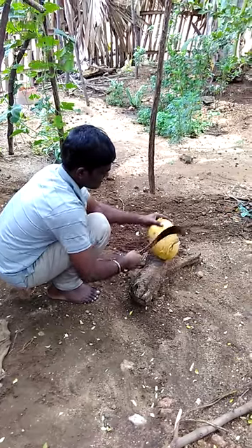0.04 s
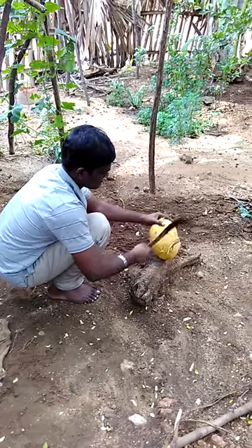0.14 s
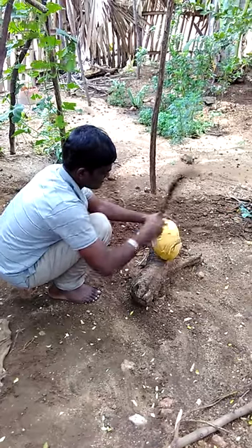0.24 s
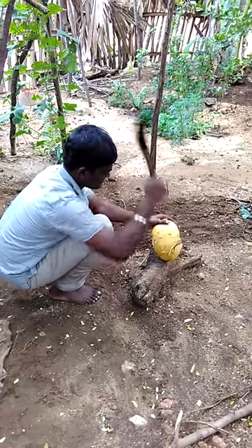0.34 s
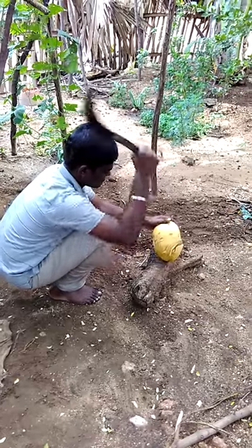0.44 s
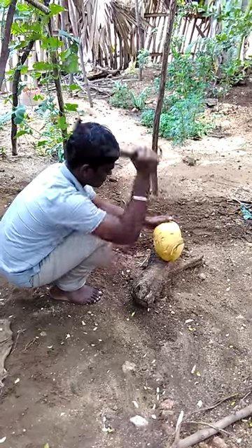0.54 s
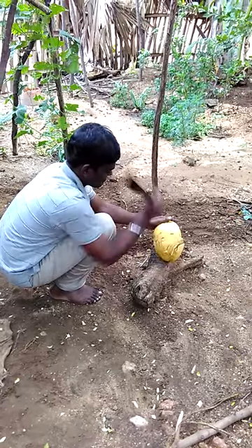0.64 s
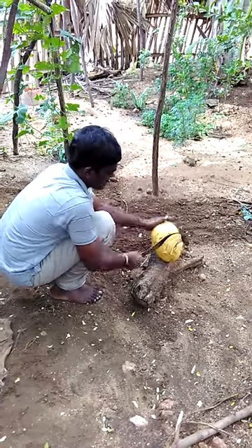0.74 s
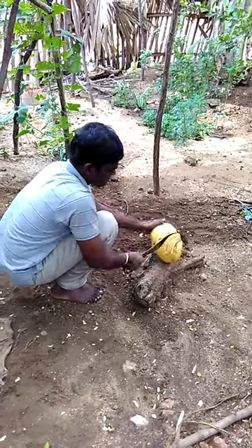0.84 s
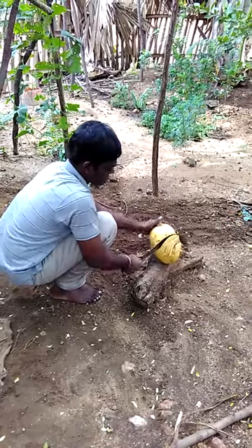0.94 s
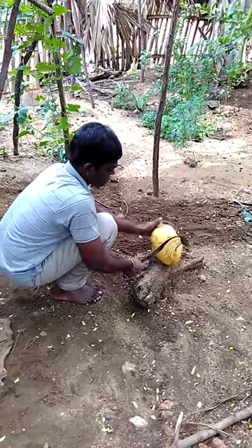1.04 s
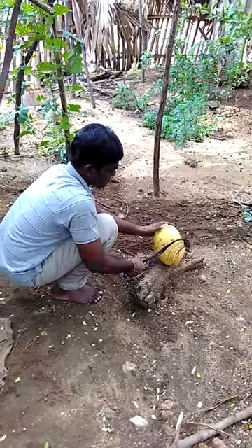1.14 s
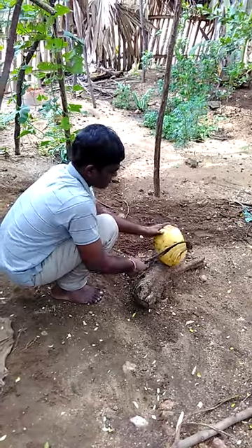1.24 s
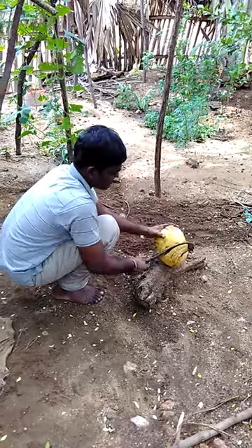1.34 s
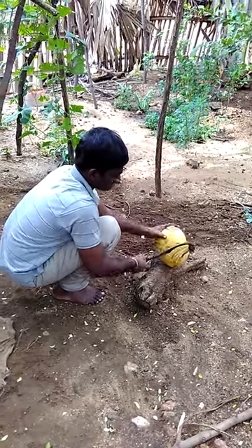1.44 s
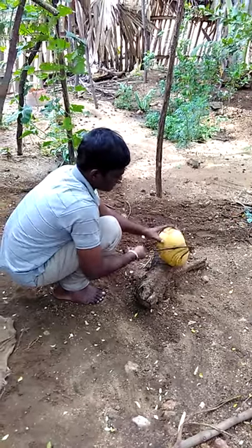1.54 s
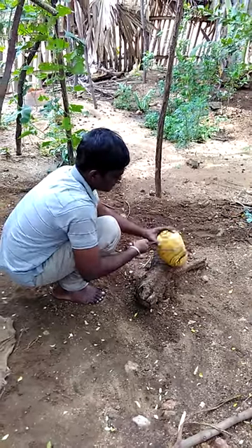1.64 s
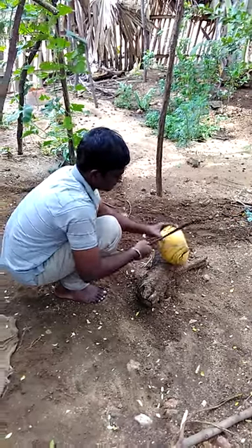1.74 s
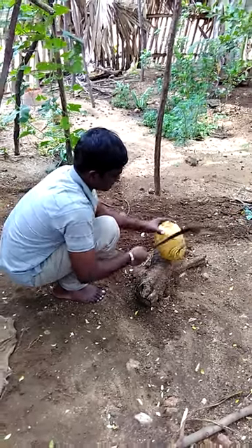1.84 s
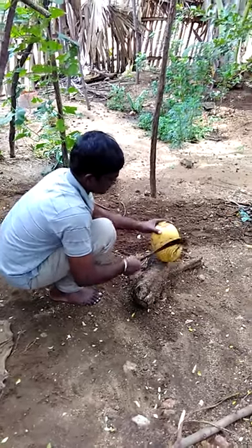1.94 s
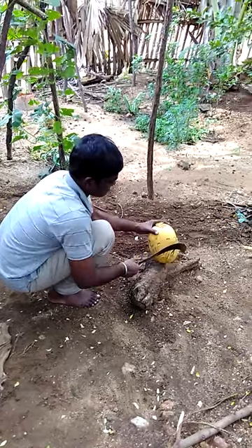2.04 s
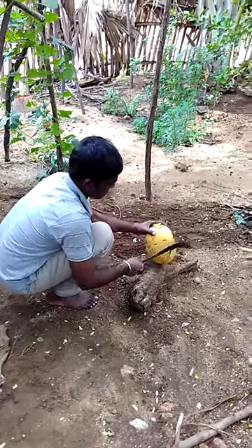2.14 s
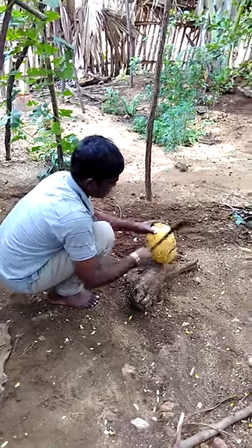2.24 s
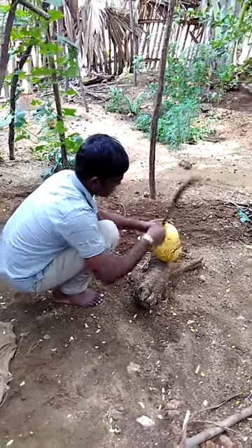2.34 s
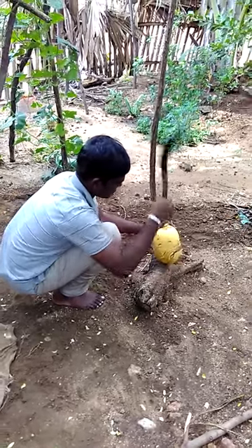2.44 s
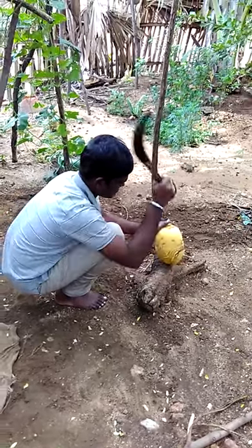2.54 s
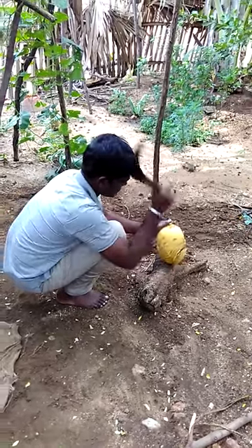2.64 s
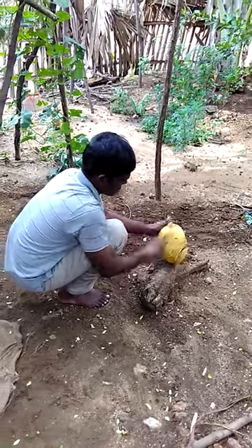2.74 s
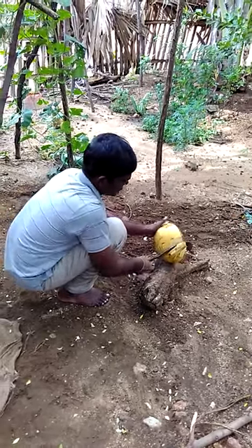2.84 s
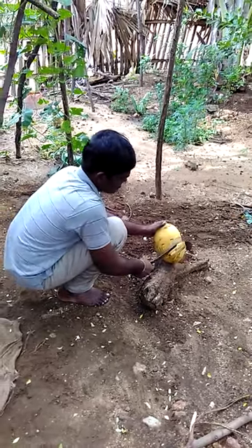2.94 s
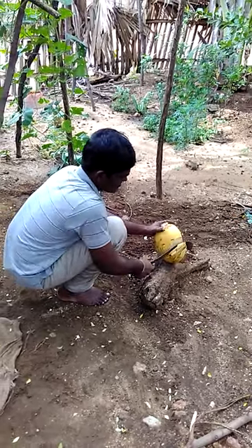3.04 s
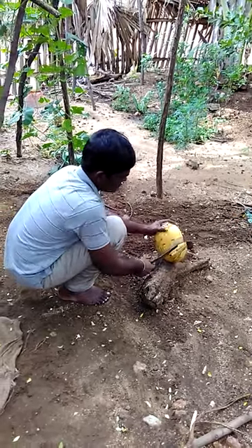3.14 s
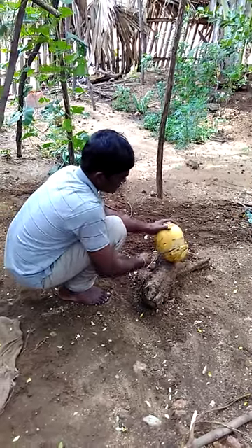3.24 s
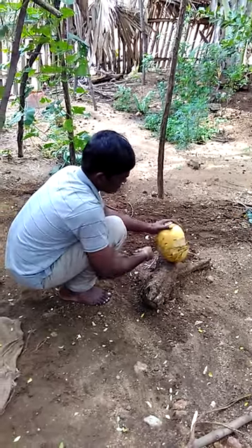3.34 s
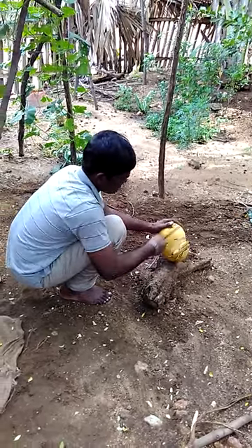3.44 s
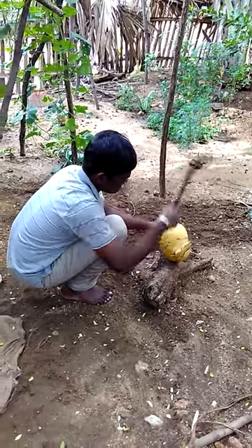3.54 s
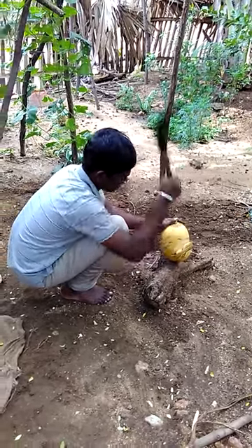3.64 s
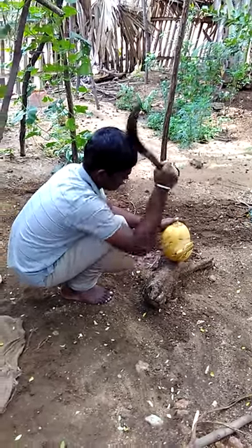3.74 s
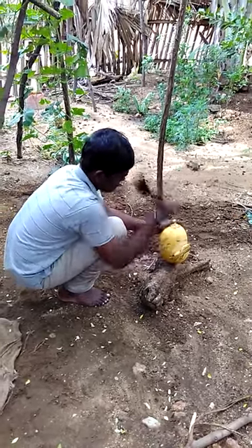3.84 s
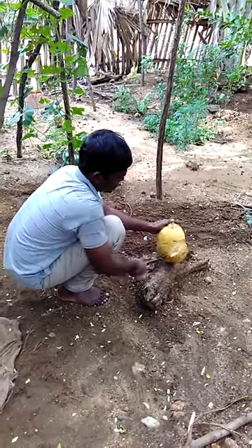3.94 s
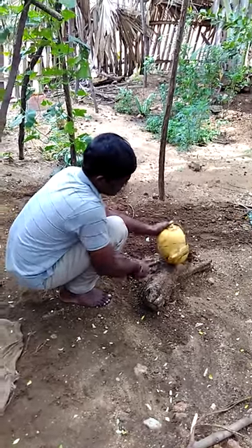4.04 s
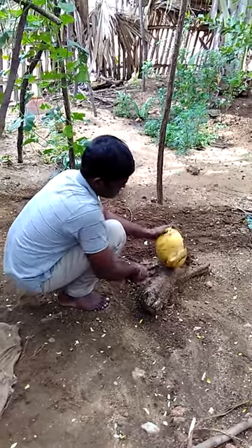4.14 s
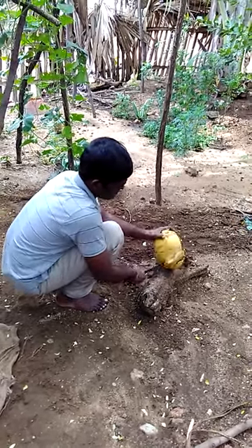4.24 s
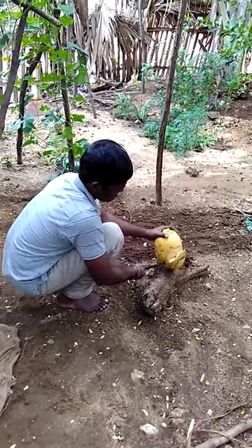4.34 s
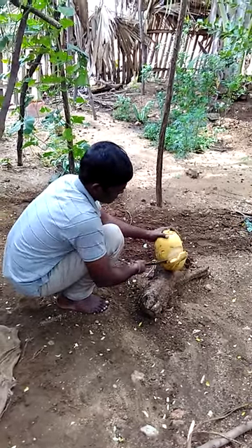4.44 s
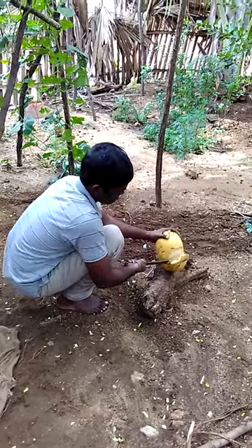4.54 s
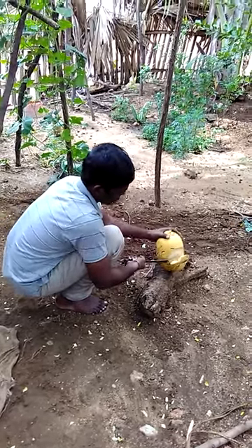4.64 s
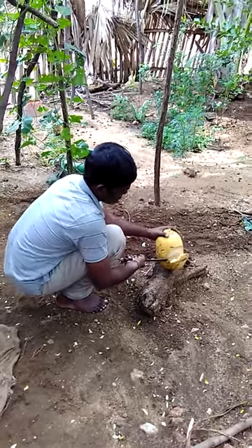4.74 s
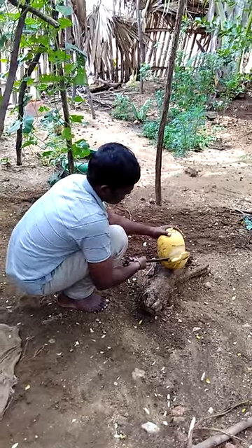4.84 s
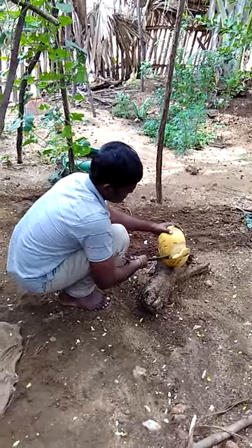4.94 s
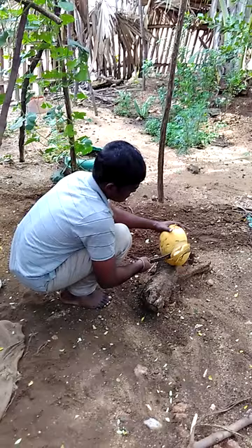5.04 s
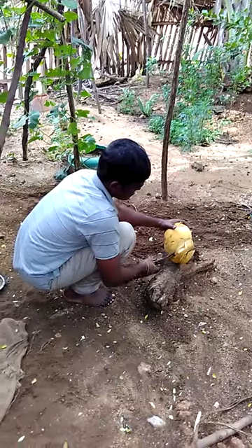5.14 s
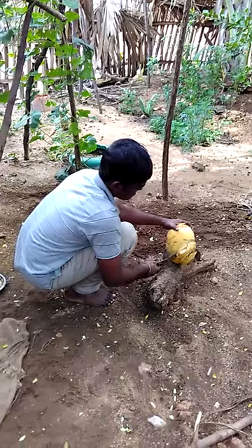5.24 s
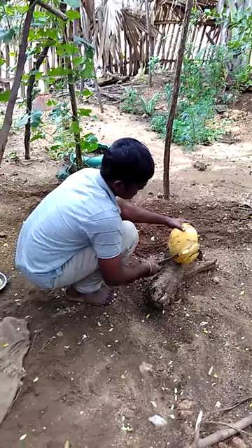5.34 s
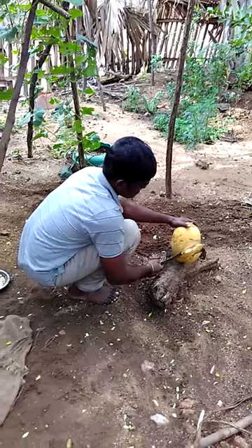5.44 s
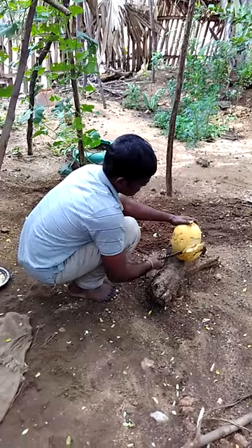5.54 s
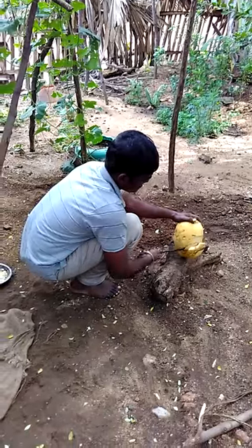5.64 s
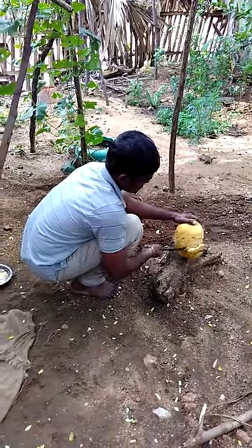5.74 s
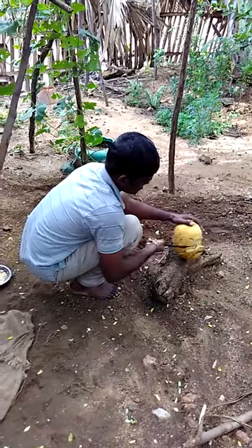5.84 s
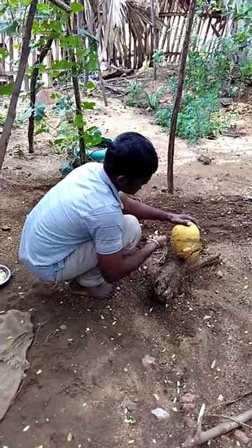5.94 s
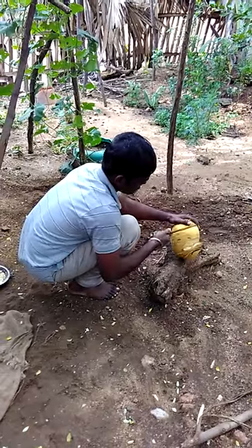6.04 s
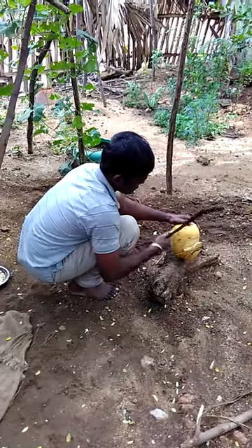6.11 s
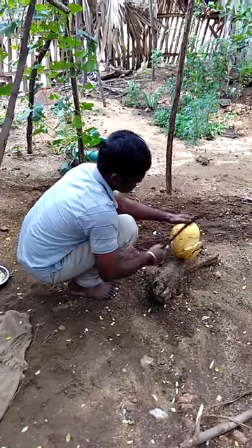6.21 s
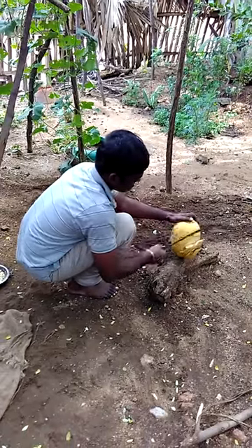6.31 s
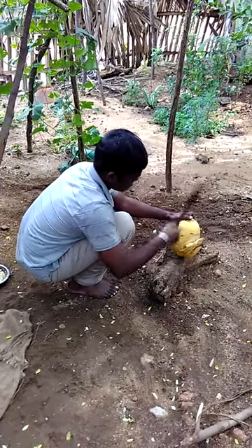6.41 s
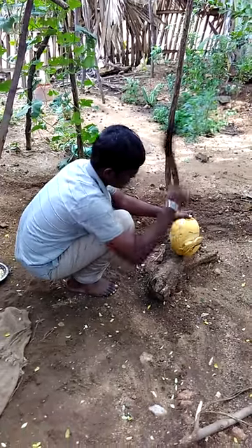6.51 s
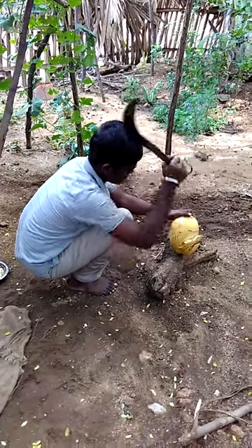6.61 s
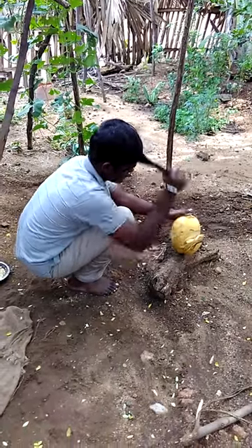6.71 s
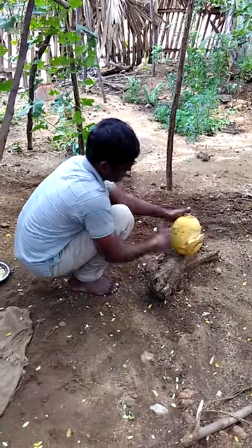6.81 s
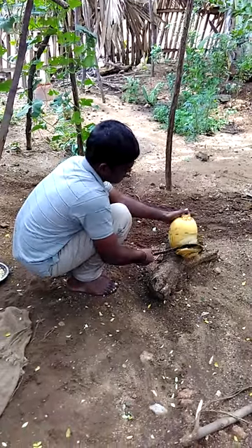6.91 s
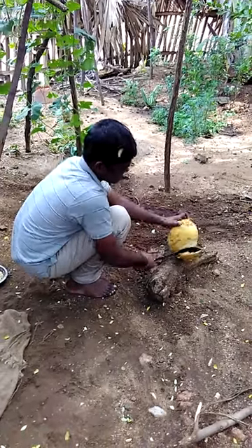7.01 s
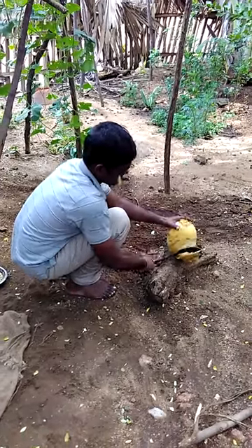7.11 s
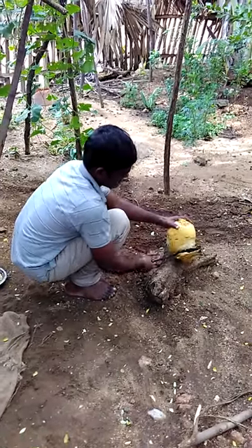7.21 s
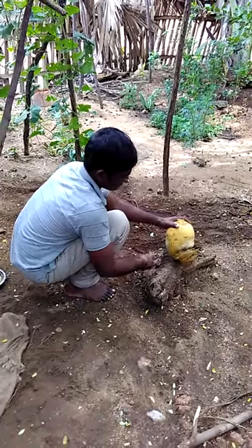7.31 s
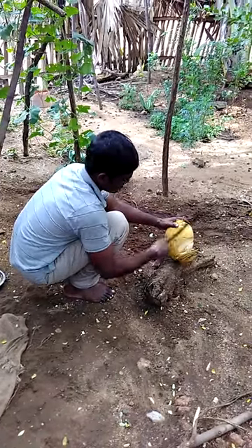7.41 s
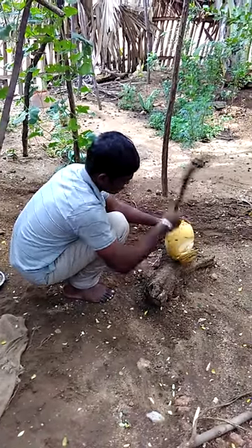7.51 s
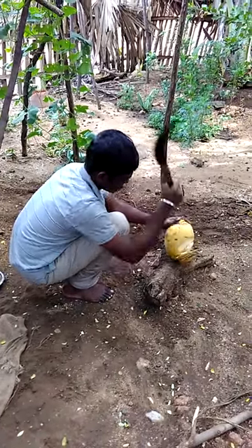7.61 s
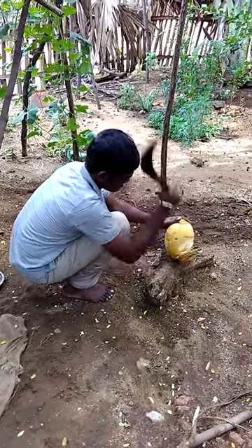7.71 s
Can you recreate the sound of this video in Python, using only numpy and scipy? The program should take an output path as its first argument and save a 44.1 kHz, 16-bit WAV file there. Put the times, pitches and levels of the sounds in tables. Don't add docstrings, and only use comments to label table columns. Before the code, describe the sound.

Outdoors, a heavy blade bites wet husk four times, irregularly spaced; between hits fibres rub and snap, birds chirp, and wind rumbles the microphone.

```python
import sys
import numpy as np
from scipy import signal
from scipy.io import wavfile
from scipy.ndimage import uniform_filter1d

SR = 44100
rng = np.random.default_rng(int(sys.argv[2]) if len(sys.argv) > 2 else 0)


def elevation(decibels):
    levels = np.asarray(decibels, float)
    return 10 ** (levels / 20)


def waveform_to_disk(signal):
    frames = np.transpose(np.atleast_2d(signal))
    scaled = np.clip(frames, -1, 1) * 32767
    samples = np.round(scaled).astype(np.int16)
    wavfile.write(sys.argv[1], SR, samples)


N = 342657
LEAD_S = .004


def evened(x):
    return x / np.sqrt(np.mean(x ** 2) + 1e-20)


def read(points, hz):
    f, value = np.transpose(points)
    return np.interp(np.log(hz + 1), np.log(f + 1), value)


def add(mix, s, sound):
    part = mix[..., round(s * SR):][..., :sound.shape[-1]]
    part += sound[..., :part.shape[-1]]


def colour(x, points):
    hz = abs(np.fft.fftfreq(8192, 1 / SR))
    log_gain = np.log(elevation(read(points, hz)))
    taps = np.fft.ifft(np.exp(np.conj(signal.hilbert(log_gain)))).real[:4096]
    taps = taps.reshape((1,) * (x.ndim - 1) + (-1,))
    return signal.oaconvolve(x, taps, axes=-1)[..., :x.shape[-1]]


def resonate(x, hz, width_hz):
    turn = np.exp(2j * np.pi * np.cumsum(hz * np.ones(len(x))) / SR)
    r = np.exp(-np.pi * width_hz / SR)
    return 2 * (turn * signal.lfilter([1 - r], [1, -r], x / turn)).real


def resonate_twice(x, hz, width_hz):
    return resonate(resonate(x, hz, width_hz), hz, width_hz)


def swells(rows, still_db):
    t, level_db = np.arange(0, N + 64, 64) / SR, []
    for s, db, swell_s, fade_s in rows:
        spans = np.where(t < s, (s - t) / swell_s, (t - s) / fade_s)
        level_db.append(db - 20 * spans)
    return np.maximum(np.interp(np.arange(N) / SR, t, np.max(level_db, axis=0)), still_db)


def diffuse(points, patchy_db, size):
    # pitch_hz, correlation (0-1)
    likeness = [(60, 1), (200, 0.91), (500, 0.7), (1200, 0.56), (2500, 0.041), (8000, 0.074)]
    frames, hz = 4 * N // size + 5, np.fft.rfftfreq(size, 1 / SR)
    a, b, c, d, patches = rng.standard_normal((frames, len(hz), 5)).T
    patches = evened(uniform_filter1d(uniform_filter1d(patches, size=6, axis=0), size=20, axis=1))
    same = np.clip(read(likeness, hz), 0, 1)[:, None]
    left = a + 1j * b
    right = same * left + np.sqrt(1 - same ** 2) * (c + 1j * d)
    z = np.array([left, right]) * elevation(read(points, hz)[:, None] + patchy_db * patches)
    return evened(signal.istft(z, nperseg=size, noverlap=3 * size // 4)[1][:, :N])


def yard(x, lumpy_db, far):
    # pitch_hz, t60_s
    decay = [(60, 0.22), (300, 0.23), (1000, 0.16), (3000, 0.18), (7000, 0.17), (12000, 0.14)]
    count = SR // 2
    taps = rng.standard_normal((2, count)) * (rng.random((2, count)) < .15)
    taps[1] = 0.16 * taps[0] + 1.2 * taps[1]
    taps *= elevation(lumpy_db * evened(uniform_filter1d(rng.standard_normal(count), size=40)))
    hz, t, z = signal.stft(taps, SR, nperseg=256)
    fade_db = -60 * t / (far * read(decay, hz)[:, None])
    tail = signal.istft(z * elevation(fade_db), SR, nperseg=256)[1]
    tail[:, :100] = 0
    tail[:, -4000:] *= np.linspace(1, 0, 4000) ** 2
    return signal.fftconvolve(x, tail / np.linalg.norm(tail[0]), axes=1)[:, :x.shape[1]]


def burst(db, hz, width_s):
    t = np.arange(SR // 5) / SR - .1
    bell = np.exp(-np.log(16) * (t / width_s) ** 2)
    return elevation(db) * bell * np.cos(2 * np.pi * (hz * t + rng.random()))


def call(length_s, first_hz, last_hz, width_hz, db):
    t = np.arange(round(length_s * SR)) / SR
    glide_hz = np.linspace(first_hz, last_hz, len(t))
    tone = resonate_twice(rng.standard_normal(len(t)), glide_hz, width_hz)
    return elevation(db) * evened(tone) * signal.windows.tukey(len(t), .3)


def open_air():
    # pitch_hz, level_db
    air = [(40, -4.5), (150, 16), (400, 0), (700, -6.5), (1500, -6.5), (3000, -6), (6000, -10.5),
           (10000, -19), (15000, -21)]
    return elevation(-66.5) * diffuse(air, patchy_db=1.6, size=1024)


def wind():
    # pitch_hz, level_db
    turbulence = [(15, -33), (35, 0.5), (60, 8.5), (100, -0.5), (140, -14), (220, -25.5), (500, -47)]
    # peak_s, level_db, swell_and_fade_s, left_minus_right_db
    gusts = [(.005, -22.5, 0.0096, -10.5), (0.128, -37, 0.098, -16.5), (0.198, -33.5, 0.019, 15),
             (0.426, -57, .2, -11), (.82, -33, 0.11, -4), (1.47, -61, .6, 13), (2.901, -63, 0.27, 8),
             (3.049, -58, 0.3, 13), (3.29, -55.5, 0.11, -5), (3.42, -52.5, 0.19, -12),
             (3.57, -55, 0.077, -9), (4.05, -58.5, 0.34, -2), (4.439, -51.5, 0.49, 8),
             (4.931, -49, 0.038, -6), (5.048, -60, 0.23, -27), (5.348, -54.5, 0.031, -20),
             (5.462, -45, 0.085, -29.5), (5.56, -44, 0.37, 2), (5.742, -39, 0.088, -13),
             (5.8, -44, 0.059, -13), (6.06, -53, 0.086, 10), (6.178, -31.5, 0.048, 6),
             (6.28, -52, 0.053, 28), (6.34, -39, 0.096, 4.5), (6.499, -42.5, 0.042, -35),
             (6.689, -51.5, 0.064, -11), (6.91, -54, 0.13, 14)]
    # time_s, level_db
    breeze = [(0, -54), (1.149, -66), (2, -68), (2.75, -70.5), (3.699, -72.5), (4.3, -58.5), (4.87, -88),
              (6.8, -65), (7.77, -68)]
    breeze_db = np.interp(np.arange(N) / SR, *np.transpose(breeze))
    level_db = []
    for side in (.5, -.5):
        rows = [(s, db - 4 + side * pan_db, span_s, span_s) for s, db, span_s, pan_db in gusts]
        level_db.append(swells(rows, breeze_db + side * 7.5))
    noise = colour(rng.standard_normal((2, N)), turbulence)
    return elevation(np.array(level_db) - 5.5) * evened(noise)


def eddies():
    # peak_s, peak_db, pitch_hz, width_s, port (0 left, 1 right)
    vortices = [(0.079, -42, 81, 0.011, 1), (0.124, -30, 78, 0.0069, 1), (0.143, -34, 61, 0.013, 1),
                (3.293, -43.5, 64, 0.016, 1), (4.41, -45.5, 121, .01, 0), (4.449, -45, 69.3, .012, 0),
                (4.476, -48, 136, 0.0094, 0), (4.937, -40, 60.7, 0.038, 1), (5.001, -43, 78, .04, 1),
                (5.084, -42, 50.6, 0.044, 1), (5.341, -42, 62.5, 0.021, 1), (5.439, -27, 67.4, 0.024, 1),
                (5.466, -35, 74, .012, 1), (5.491, -39, 175, 0.014, 1), (5.496, -25.5, 98, 0.028, 1),
                (5.563, -38, 65.5, 0.022, 1), (5.627, -40.5, 66, 0.011, 0), (5.727, -35, 64, 0.027, 1),
                (5.769, -28.5, 97, 0.0093, 1), (5.811, -44, 65, 0.021, 1), (6.182, -28, 70, 0.01, 0),
                (6.314, -34, 67.7, 0.057, 0), (6.339, -34.5, 68, 0.04, 1), (6.465, -35, 69, 0.015, 1),
                (6.497, -28.5, 85, 0.022, 1)]
    mix = np.zeros((2, N))
    for s, db, hz, width_s, port in vortices:
        cut = max(round((.1 - s) * SR), 0)
        add(mix[round(port)], max(s - .1, 0), burst(db - 5, hz, width_s)[cut:])
    return mix


def chip(db, hz, overtone_db, held_s):
    t = np.arange(round(.09 * SR)) / SR
    glide_hz = hz * (1.04 - .12 * (1 - np.exp(-t / .05)))
    after = np.maximum(t - held_s, 0)
    first, second = rng.standard_normal((2, len(t)))
    low = np.sin(2 * np.pi * np.cumsum(glide_hz) / SR)
    low += 0.45 * evened(resonate_twice(first, glide_hz, 380))
    low *= np.clip(t / .008, 0, 1) * np.exp(-after / .012)
    high = evened(resonate_twice(second, 2 * glide_hz, 380))
    high *= np.clip(t / .014, 0, 1) * np.exp(-after / 0.058)
    return elevation(db - 3) * (low + elevation(overtone_db - 2.5) * high) * signal.windows.tukey(len(t), .1)


def birds():
    # start_s, peak_db, pitch_hz, overtone_rel_db, held_s
    chips = [(0.2138, -56.5, 3505, -4.5, 0.021), (0.637, -54, 3524, -7, 0.019),
             (2.59, -60, 3437, -0.5, 0.023), (3.383, -56.5, 3393, -1.5, 0.012),
             (3.7474, -55.5, 3320, -4.5, 0.0078), (5.5393, -58.5, 3460, -2.5, .03),
             (6.0558, -55.5, 3460, -3.5, 0.017), (6.509, -58, 3533, -0.5, 0.033),
             (7.356, -54, 3453, -8, 0.018)]
    # start_s, length_s, pitch_hz, level_db
    coos = [(2.09, 0.15, 744, -67.5), (3.078, 0.19, 558, -72.5), (3.289, 0.1, 699, -68),
            (4.36, 0.14, 1455, -76.5), (4.383, 0.098, 206, -64.5), (4.671, 0.44, 792, -76.5),
            (4.717, 0.048, 445, -62.5), (5.07, 0.069, 485, -70.5), (1.051, 0.56, 278, -78.5),
            (5.969, 0.29, 287, -69.5), (7.094, .46, 256, -76.5)]
    # start_s, length_s, pitch_hz, level_db
    caws = [(.38, .15, 1100, -78), (0.522, 0.17, 1700, -74), (1.264, .027, 1840, -61.5),
            (1.2, 0.071, 1130, -63.5), (2.3, .08, 1150, -75), (3.7, 0.19, 1680, -74),
            (4.726, 0.11, 1510, -64.5), (4.853, 0.19, 1570, -71), (5.055, .21, 1567, -70.5),
            (5.2, 0.38, 1745, -80), (6.095, .06, 1240, -75), (6.165, .07, 1140, -70)]
    # start_s, length_s, first_hz, last_hz, level_db
    whistles = [(.527, 0.3, 2830, 2780, -76.5), (.9, 0.24, 3300, 3240, -81),
                (1.158, 0.042, 3366, 3360, -68.5), (1.25, 0.095, 5590, 5100, -76.5),
                (1.8, .18, 2780, 2880, -71.5), (3.487, 0.11, 5980, 5900, -71.5),
                (3.654, 0.045, 3170, 3117, -72), (3.951, 0.045, 5500, 5200, -68.5),
                (4.13, 0.13, 6760, 5300, -65), (4.15, 0.14, 6500, 5400, -68),
                (4.435, 0.067, 5870, 6200, -71.5), (5.185, 0.15, 2800, 2700, -72),
                (5.912, 0.13, 2826, 2774, -70.5), (6.597, 0.052, 2930, 2730, -68),
                (6.65, 0.13, 3000, 2800, -74), (6.72, .065, 7350, 7300, -75),
                (.745, 0.028, 3150, 3400, -66), (6.312, .03, 3200, 3130, -81),
                (1.79, 0.068, 4500, 4300, -65), (1.795, .065, 4100, 4000, -65),
                (7.278, 0.092, 2754, 2940, -73.5), (7.455, .13, 3150, 3200, -69.5),
                (7.6, 0.15, 3230, 3270, -72), (7.405, 0.049, 5100, 5170, -76),
                (4.495, 0.03, 3600, 3700, -71), (4.26, .05, 1600, 1960, -73),
                (4.75, 0.074, 2700, 2550, -74), (6.35, 0.046, 5100, 5500, -80.5),
                (1.99, 0.074, 2840, 2850, -83)]
    # start_s, length_s, first_hz, last_hz, level_db
    rasps = [(.0, 0.1, 5120, 4800, -68), (1.775, 0.058, 3300, 3440, -64), (1.785, 0.094, 4170, 4110, -64.5),
             (2.29, 0.26, 1945, 1787, -70), (2.555, 0.038, 907, 1000, -64.5),
             (6.37, 0.044, 3890, 3500, -76.5), (4.74, 0.084, 3460, 3050, -76.5),
             (3.544, 0.1, 4890, 4770, -71.5), (4.983, 0.089, 4140, 3120, -74.5),
             (5.311, 0.07, 4370, 3420, -72.5), (5.665, 0.053, 7400, 6950, -58),
             (5.678, 0.06, 6500, 6040, -59), (5.729, 0.17, 4850, 4930, -71.5),
             (7.078, 0.36, 1840, 1590, -71)]
    mix = np.zeros(N)
    for s, *rest in chips:
        add(mix, s - .004, chip(*rest))
    for s, length_s, hz, db in coos:
        add(mix, s, call(length_s, hz, hz, 39.5, db))
    for s, length_s, hz, db in caws:
        add(mix, s, call(length_s, hz, hz, 0.089 * hz, db))
    for table, blur in (whistles, 0.034), (rasps, 0.19):
        for s, length_s, first_hz, last_hz, db in table:
            add(mix, s, call(length_s, first_hz, last_hz, blur * first_hz, db))
    return mix


def squeaks():
    # start_s, length_s, slip_rate_hz, level_db
    slips = [(1.617, 0.08, 1745, -75), (3.27, .09, 1742, -75.5), (3.375, .07, 1742, -77),
             (5.941, 0.069, 1740, -67.5), (6.64, 0.11, 830, -81), (7.3, .1, 1742, -81.5)]
    mix = np.zeros(N)
    for s, length_s, hz, db in slips:
        for k in np.arange(9000 // hz + 1, 14000 // hz + 1):
            add(mix, s, call(length_s, k * hz, k * hz, 150, db + 3 * rng.standard_normal()))
    return mix


def in_yard(mono):
    direct = np.array([mono, np.roll(mono, 4)])
    return elevation(3.5) * direct + yard(mono[None], lumpy_db=4.5, far=3.1)


def rubbing():
    # pitch_hz, level_db
    scrape = [(500, -41), (1500, 1.5), (3000, -8.5), (5000, -7), (8000, -1), (12000, -1.5), (15000, 1)]
    # peak_s, level_db, swell_s, fade_s
    strokes = [(.016, -51, 0.042, 0.66), (.288, -49.5, 0.033, 0.17), (.47, -55.5, .004, 4.3),
               (.77, -48, 0.11, 0.49), (1.12, -53, 0.94, 0.14), (1.25, -52.5, 0.067, 0.25),
               (1.462, -46, 0.0072, 0.4), (1.645, -40.5, 0.23, 0.074), (1.84, -54.5, .1, 0.35),
               (2.058, -54, 0.016, 0.088), (2.512, -58.5, .006, .9), (3.26, -49.5, 0.003, 0.5),
               (3.408, -46, 0.14, 0.079), (3.58, -55.5, 1, .8), (3.93, -59, 0.044, 0.55),
               (4.2, -55.5, 0.43, 0.63), (4.44, -52.5, 0.15, 1.3), (4.598, -51, 0.036, 0.64),
               (4.85, -54, 1, 1.1), (5.13, -52.5, 0.3, 0.28), (5.49, -53.5, 0.24, 0.17),
               (5.78, -53, 1, 0.35), (5.86, -50, 0.17, 0.76), (5.98, -47.5, 0.2, .1),
               (6.156, -50.5, 0.0046, 0.4), (6.68, -50.5, 0.26, 0.69), (7.12, -60, .6, 1.5),
               (7.37, -53, 0.085, 0.038), (7.434, -55, 0.11, 0.23), (7.558, -55.5, 0.0081, 0.099)]
    # pitch_hz, level_db
    shuffle = [(100, -23), (300, -14.5), (650, 3.5), (1200, -10.5), (2200, -17.5), (4000, -28.5)]
    # peak_s, level_db, swell_s, fade_s
    shifts = [(.01, -65.5, 0.056, 0.29), (.466, -69.5, 0.037, 1), (.714, -61, 0.05, 0.36),
              (1.02, -65.5, 0.99, 0.36), (1.22, -60, 0.097, 1.2), (1.614, -66.5, .4, .9),
              (1.806, -63.5, 0.37, 0.038), (2.02, -67.5, 0.53, 0.019), (2.516, -62.5, 0.092, 0.37),
              (3.08, -63.5, 0.99, 0.22), (3.408, -69, 0.26, 0.8), (4.2, -67.5, 0.5, 0.53),
              (4.74, -66.5, 0.24, 0.34), (5.13, -67.5, 0.63, 0.29), (5.78, -71, 1, 0.045),
              (6.15, -62, 0.074, 0.35), (6.87, -66, 0.13, 0.22), (7.558, -69, .02, .015)]
    grit = elevation(2.6 * evened(uniform_filter1d(rng.standard_normal(N), size=60)))
    grains = elevation(swells(strokes, -76) - 9) * grit * diffuse(scrape, patchy_db=2.5, size=256)
    return grains + elevation(swells(shifts, -79.5) + 1.5) * diffuse(shuffle, patchy_db=3, size=1024)


def taps_on_log():
    # peak_s, peak_db, pitch_hz
    nut_taps = [(.694, -54.5, 480), (1.034, -56.5, 600), (1.196, -53, 900), (1.235, -57, 1500),
                (2.512, -46.5, 800), (2.511, -48.5, 1870), (2.542, -46, 820), (2.2, -53, 700),
                (2.527, -51, 750)]
    mix = np.zeros((2, N))
    for s, db, hz in nut_taps:
        add(mix, s - .1, burst(db, hz, .004) * np.array([[1], [.3]]))
    return mix


def snap(db, low_db):
    # pitch_hz, level_db
    tick_tone = [(500, -22), (3000, -3.5), (7000, -2.5), (9500, 1.5), (15000, 5.5)]
    t = np.arange(2000) / SR
    tick = rng.standard_normal((2, len(t))) * np.exp(-t / .001)
    tick /= abs(tick).max(axis=1, keepdims=True)
    push = rng.standard_normal(len(t)) * np.exp(-t / .001)
    knock = resonate(resonate(push, 1930, 750), 2000, 1200)
    after = 0.048 * rng.standard_normal((2, len(t))) * np.exp(-t / 0.037)
    return elevation(db - 10) * colour(tick + after, tick_tone) + elevation(db + low_db - 2.5) * knock / abs(knock).max()


def snaps():
    # start_s, peak_db, low_part_rel_db
    single = [(0.4678, -35, -36), (1.2364, -37, -13), (1.4576, -44, -23.5), (1.5938, -23, -12),
              (1.6084, -25, -16), (2.052, -46, -36), (2.5108, -40.5, -7), (2.594, -37.5, -24),
              (2.76, -44, -30), (3.2615, -40.5, -35), (6.1534, -37, -38), (7.2015, -34, -26),
              (7.3535, -36, -35), (7.3622, -30, -35.5), (7.559, -30, -34), (7.5903, -32.5, -29)]
    # start_s, peak_db, low_part_rel_db
    prising = [
        (4.6043, -18, -40),
        (4.6128, -25, -26),
        (4.6152, -23, -13),
        (4.6522, -35, -28),
        (4.679, -28, -40),
    ]
    mix = np.zeros((2, N))
    for s, *rest in [*single, *prising]:
        add(mix, s + 0.00029, snap(*rest))
    return mix


def ripping(begin_s, t):
    # start_s, level_rel_tearing_db, fade_s, right_minus_left_db
    bundles = [(0.7801, -26, .003, 3), (.796, -6, .0008, -6), (0.7983, -6, .0008, -8),
               (0.802, -7, .001, -6), (.810, -10, .001, -6), (.8152, -11, .001, -2), (2.8362, -26, .003, 4),
               (2.8444, -5, .002, -4), (2.8498, -6.5, .0012, -7), (3.986, -20, .003, 2),
               (3.994, -4, .0012, 4), (4.0156, -14, .001, -2), (4.0212, -14, .001, -4),
               (6.8822, -28, .003, 5), (6.895, -5, .002, 9.5), (6.910, -13, .001, -3),
               (6.9219, -16.5, .001, -2.5)]
    extra = np.zeros((2, len(t)))
    for s, db, fade_s, right_db in bundles:
        if s > begin_s:
            since = t - (s - begin_s)
            shape = np.clip(since / .0003, 0, 1) * np.exp(-np.maximum(since, 0) / fade_s)
            extra += elevation(np.array([[db], [db + right_db]])) * shape
    return extra


def body_ring(t, near, other, stop_s, knock_hz, knock_db, thud_db, jolt_db, right_db):
    # pitch_hz, width_hz, level_db
    modes = [(77, 96, -10), (239, 82, -12), (370, 220, -7.5), (676, 280, -1)]
    after = np.maximum(t - stop_s, 0)
    load = np.clip(t / stop_s, 0, 1) ** 2.1
    load *= np.exp(-after / 0.0061) + elevation(-10) * np.exp(-after / .024)
    push = load * near
    jolt = push + elevation(jolt_db) * np.exp(-((t - stop_s) / 0.0001) ** 2)
    thud = sum(elevation(db) * resonate(push + 0.49 * jolt, hz, width_hz) for hz, width_hz, db in modes)
    left = resonate(jolt, knock_hz, 300)
    right = elevation(right_db) * resonate(0.71 * jolt + 0.41 * load * other, knock_hz, 300)
    return elevation(thud_db + 8) * thud * elevation(np.array([[0], [1.]])) + elevation(knock_db + 4) * np.array([left, right])


def falling_debris(t, other, debris_db):
    # pitch_hz, level_db
    crumbs = [(300, -15), (1500, -2.5), (3000, -4), (5500, 0), (8000, -3), (11500, -11), (15000, -11.5)]
    level_db = debris_db - 79 * t + 2.8 * evened(uniform_filter1d(other, size=150))
    return colour(rng.standard_normal((2, len(t))), crumbs) * elevation(level_db) * np.clip(t / 0.019, 0, 1)


def ground_boom(t, other, stop_s, boom_db):
    sinking_hz = 68 + (166 - 68) * np.exp(-np.maximum(t - stop_s, 0) / 0.027)
    boom = evened(resonate_twice(other, sinking_hz, 82))
    boom *= np.clip(t / 0.017, 0, 1) * elevation(boom_db - 124.5 * t)
    return boom * elevation(np.array([[0], [-4.]]))


def chop(start_s, slowing_db_per_s, force_db, tearing_s, rise_s, knock_hz, knock_db, thud_db, stop_s,
         debris_db, jolt_db, right_db, boom_db):
    # pitch_hz, level_db
    tear_tone = [(40, -25), (200, -8.5), (700, -11.5), (1800, 2), (3000, 0.5), (6000, -3.5), (10000, -1),
                 (15000, 0)]
    t = np.arange(SR // 2) / SR
    rips = ripping(start_s - LEAD_S, t)
    t = t - LEAD_S
    stroke_db = -np.maximum(t - tearing_s, 0) * 5000 - slowing_db_per_s * t
    stroke = np.clip(t / rise_s, 0, 1) ** 2 * elevation(stroke_db)
    near, other = rng.standard_normal((2, len(t))) * elevation(3.7 * rng.standard_normal((2, len(t))))
    breaks = (stroke + rips) * np.array([near, .6 * np.roll(near, 1) + 0.95 * other])
    tear = colour(breaks, tear_tone)
    body = body_ring(t, near, other, stop_s, knock_hz, knock_db, thud_db, jolt_db, right_db)
    echoes = elevation(-7.5) * yard(tear + 0.33 * body, lumpy_db=2.8, far=1.59)
    blow = tear + body + echoes + falling_debris(t, other, debris_db)
    return elevation(force_db - 12) * blow + ground_boom(t, other, stop_s, boom_db)


def chops():
    # start_s, force_db, tearing_s, rise_s
    blows = [
        (.782, 2, 0.0055, 0.00081),
        (2.838, -3.5, 0.0066, 0.0012),
        (3.9875, -4, 0.0085, 0.0013),
        (6.8845, -3.5, 0.014, 0.001),
    ]
    # knock_hz, knock_db, log_thud_db, blade_stop_s, debris_db
    cuts = [
        (840, -6, -7, .003, -27),
        (1577, 3.5, -3, .0052, -33.5),
        (1750, 3, -1, .0085, -27.5),
        (1880, 4.5, -7, 0.0112, -21),
    ]
    # jolt_db, right_port_knock_db, boom_db
    stops = [
        (18.5, -18, -35),
        (18, -9.5, -39.5),
        (12, -10.5, -36.5),
        (19.5, -3, -37),
    ]
    slowing = [50, 200, 50, 400]
    mix = np.zeros((2, N))
    for (s, *blow), cut, stop, slowing_db_per_s in zip(blows, cuts, stops, slowing):
        add(mix, s - LEAD_S, chop(s, slowing_db_per_s, *blow, *cut, *stop))
    return mix


def scene():
    background = open_air() + wind() + eddies() + in_yard(birds() + squeaks())
    return background + rubbing() + taps_on_log() + snaps() + chops()


def drop_common(x):
    # start_s, length_s, low_hz, high_hz
    dropouts = [(.803, .018, 3450, 4400), (.835, .035, 5050, 5300), (.88, .03, 3200, 3500),
                (.905, .05, 4650, 5050), (2.85, .012, 2900, 3200), (3.983, .012, 3900, 5100),
                (4.006, .022, 3700, 4000), (4.008, .022, 4800, 5050), (4.04, .035, 3000, 3300),
                (4.06, .03, 4900, 5400), (6.885, .022, 2200, 4350), (6.9, .025, 3200, 3500),
                (6.89, .03, 6800, 7150)]
    common = np.zeros(N)
    middle = x.mean(axis=0)
    for s, length_s, low_hz, high_hz in dropouts:
        sos = signal.butter(6, [low_hz, high_hz], "band", fs=SR, output="sos")
        band = signal.sosfiltfilt(sos, middle[round(s * SR) - 2000:][:6000])
        count = round(length_s * SR)
        add(common, s, band[2000:2000 + count] * signal.windows.tukey(count, .2))
    return x - .98 * common


def thin_out(x, margin_db, spread_db, dip_db):
    sine = np.sin(np.pi * (np.arange(2048) + .5) / 2048)
    z = signal.stft(x, SR, sine, nperseg=2048, noverlap=1024)[2]
    power = (abs(z[:, :640].reshape(2, 160, 4, -1)) ** 2).sum(axis=(0, 2))
    level_db = 10 * np.log10(power + 1e-20)
    exposed = np.arange(24, 90)
    slope_db = spread_db * abs(np.subtract.outer(exposed, np.arange(16, 160)))
    mask_db = (level_db[None, 16:] - slope_db[..., None]).max(axis=1) - margin_db
    around_db = uniform_filter1d(level_db, size=41, axis=0)[exposed]
    mask_db = np.maximum(mask_db, around_db - dip_db)
    over_db = (level_db[exposed] - mask_db).reshape(22, 3, -1).mean(axis=1)
    over_db += 4 * abs(np.linspace(-1, 1, 22))[:, None] ** 3
    over_db[[10, 14]] -= [[1.5], [2.5]]
    waver = uniform_filter1d(rng.standard_normal(over_db.shape), size=2, axis=1)
    top_db = level_db[16:].max(axis=0)
    steady = top_db < np.minimum(np.roll(top_db, 2), np.roll(top_db, 3)) + 14
    muted = steady & (over_db < 4.5 * waver)
    z[:, 96:360] *= np.repeat(~muted, 12, axis=0)
    return signal.istft(z, SR, sine, nperseg=2048, noverlap=1024)[1][:, :N]


def low_pass(x):
    return signal.sosfilt(signal.butter(12, 15500, fs=SR, output="sos"), x)


def record(dry):
    # pitch_hz, gain_db
    left_port = [(50, 4), (600, 7), (2500, 7), (5000, 7), (8000, 8), (10000, 15), (11600, 21.5),
                 (13500, 12), (16000, 3.5)]
    # pitch_hz, gain_db
    right_port = [(50, 3.5), (2500, 0), (5000, 5.5), (8000, 6), (9500, 7.5), (11600, 3.5), (13500, -3),
                  (16000, -0.5)]
    notched = dry[1] - .8 * resonate(dry[1], 12250, 420)
    ports = np.array([colour(dry[0], left_port), -colour(notched, right_port)])
    edge = signal.firwin(511, 14300, window=("kaiser", 8), fs=SR)
    limited = signal.oaconvolve(ports, edge[None], "same", axes=1)
    clipped = np.clip(limited, -1, 1)
    mix = thin_out(drop_common(clipped), margin_db=17, spread_db=.35, dip_db=3.2)
    return low_pass(mix)


dry = scene()
out = record(dry)
waveform_to_disk(out)
```